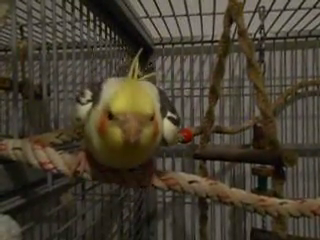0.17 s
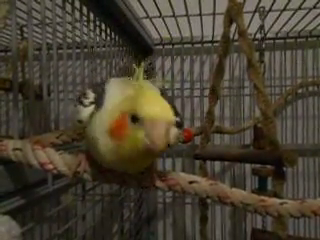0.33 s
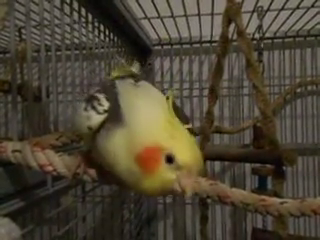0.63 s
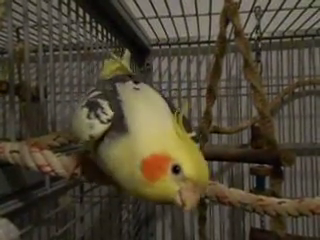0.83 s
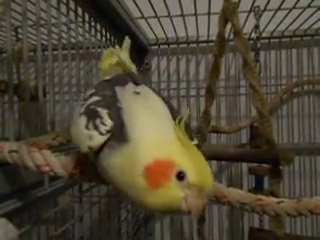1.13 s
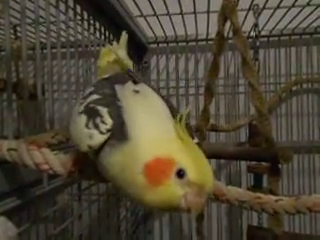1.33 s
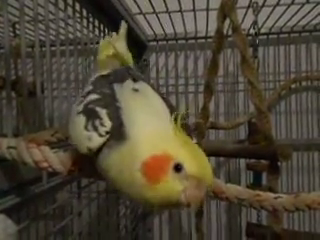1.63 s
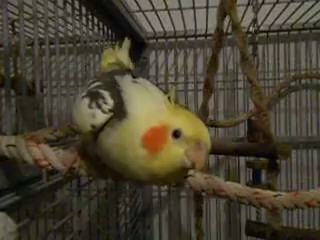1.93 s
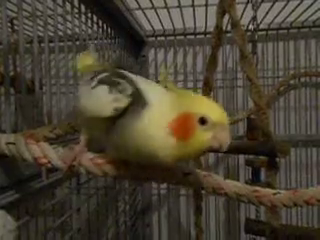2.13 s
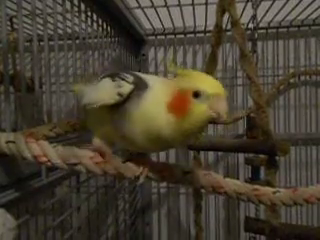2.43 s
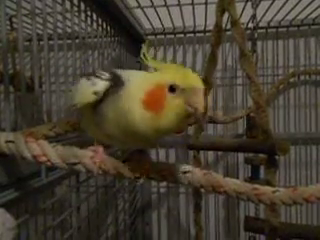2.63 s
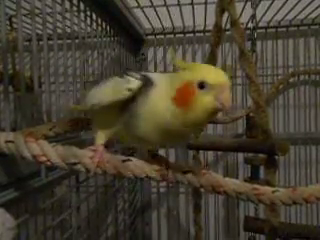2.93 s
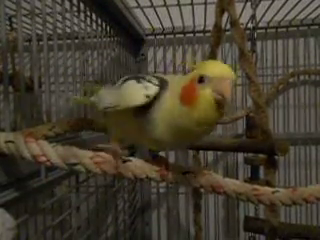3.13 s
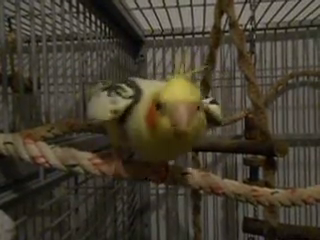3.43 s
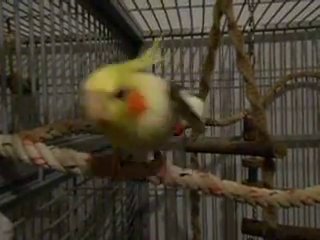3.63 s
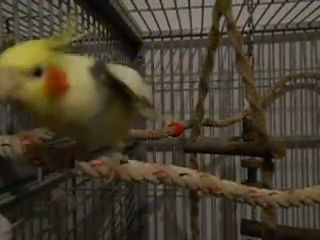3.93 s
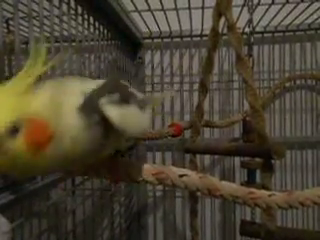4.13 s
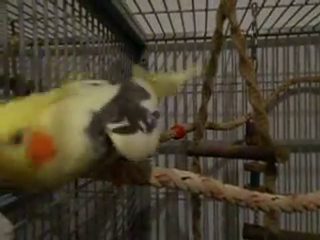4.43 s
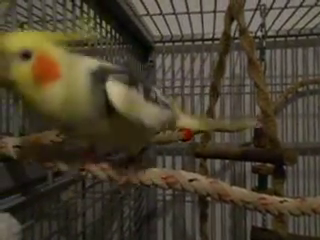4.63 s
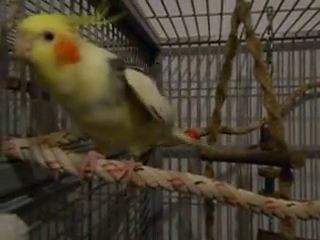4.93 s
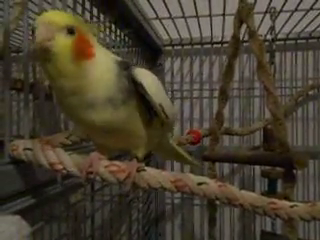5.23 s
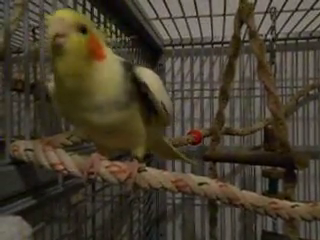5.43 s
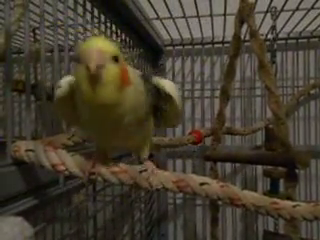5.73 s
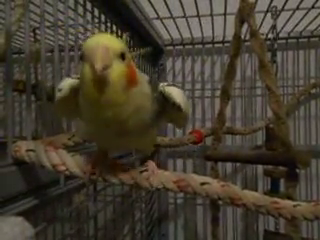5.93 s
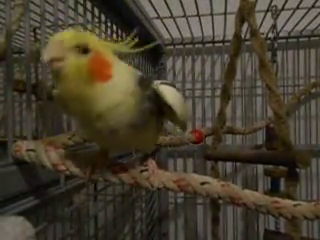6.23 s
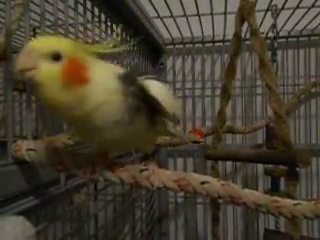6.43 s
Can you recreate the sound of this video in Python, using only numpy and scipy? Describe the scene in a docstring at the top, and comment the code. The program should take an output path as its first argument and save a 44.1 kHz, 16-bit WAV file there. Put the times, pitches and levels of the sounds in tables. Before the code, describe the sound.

A small, lightly echoing room with low steady hiss; a soft rustle peaks at 0.2 s with a low cluck. From 0.43 s a close cockatiel whistles short arched notes, each under a tenth of a second, around 2 kHz, with buzzy edges. They come in fours, the last usually lower and duller, starting near 0.4, 1.0, 1.7, 2.4, 3.0 and 3.7 s, the final run loudest and briefly crackling with distortion. A hard click and a far bird's rising call land near 1 s. From 1.3 to 4.5 s a small toy bell tinkles thinly, about four strokes a second, then weakens. At 4.3 s a foot scrapes, with a weak buzzy cluck and another far call. Quiet follows, broken by a sharp tick at 4.94 s and a cluck at 5.2 s. Loud whistles resume at 5.45-5.8 s with slight crackle, a faint distant call and weak cluck follow, and a last falling phrase runs from 6.1 s to the end.

```python
"""A cockatiel on a rope perch close to the microphone opens with a low cluck, then whistles runs of short
arched notes in a small room: gliding harmonic tones with a subharmonic buzz at onset and end.
From 1 s a more distant bird gives three calls, mostly by reflection; a toy bell of decaying modes
swings until past 4 s. Claws tick here and there, and a foot scrapes at 4.3 s as noise before the later notes.
The recorder samples at half rate, and from 3.9 s some of the loudest notes overflow by changing sign."""
import sys
import numpy as np
from scipy import signal
from scipy.fft import next_fast_len
from scipy.io import wavfile
from scipy.ndimage import uniform_filter1d

SR = 44100
rng = np.random.default_rng(int(sys.argv[2]) if len(sys.argv) > 2 else 0)


def undo_db(level):
    """Turn decibels back into plain size, where 20 dB means ten times bigger."""
    steps = np.asarray(level, float) / 20
    return 10 ** steps


def waveform_to_disk(signal):
    """Save audio, clipped to [-1, 1], as 16-bit WAV at the path in sys.argv[1]."""
    frames = np.transpose(np.atleast_2d(signal))
    scaled = np.clip(frames, -1, 1) * 32767
    samples = np.round(scaled).astype(np.int16)
    wavfile.write(sys.argv[1], SR, samples)


N = 290619


def evened(x):
    """Normalization: scales a signal to unit rms."""
    return x / np.sqrt(np.mean(x ** 2) + 1e-20)


def read(points, hz):
    """Logarithmic frequency scale: interpolates a curve on it."""
    f, value = np.transpose(points)
    return np.interp(np.log(hz + 1), np.log(f + 1), value)


def add(mix, s, sound):
    """Superposition: adds a sound to the mix at time s."""
    part = mix[round(s * SR):][:len(sound)]
    part += sound[:len(part)]


def wobble(size, hz):
    """Band-limited noise: random fluctuation of unit rms, up to about hz."""
    white = rng.standard_normal(size + 2000)
    return evened(signal.lfilter(*signal.butter(2, hz, fs=SR), white)[2000:])


def tents(rows):
    """Exponential level change: in dB, two straight slopes per row (t, level, rise before, fall after)."""
    t = np.arange(N) / SR
    return np.array([level - np.where(t < s, before * (s - t), after * (t - s))
                     for s, level, before, after in rows])


def noise(spectrum, level_db, patchy_db):
    """Spectral shaping of Gaussian noise: random short-time spectra, uneven in small patches."""
    hz = np.fft.rfftfreq(512, 1 / SR)
    real, imaginary, patches = rng.standard_normal((N // 128 + 5, 257, 3)).T
    patches = evened(uniform_filter1d(uniform_filter1d(patches, 6, 0), 16, 1))
    spectra = (real + 1j * imaginary) * undo_db(read(spectrum, hz)[:, None] + patchy_db * patches)
    return evened(signal.istft(spectra, nperseg=512, noverlap=384)[1][:N]) * undo_db(level_db)


# spectral shape of the steady background: f/Hz, relative density/dB
AIR = [(35, -28), (60, -20.5), (1240, -8.5), (1450, -3), (2910, -10.5), (3540, -21.5), (9040, -34.5),
       (11000, -45), (14300, -68), (22000, -120)]
# spectral shape of the rustle: f/Hz, relative density/dB
RUSTLE = [(120, -37.5), (200, -16.5), (2020, -5.5), (2270, -20.5), (6650, -19), (11000, -30), (14300, -46),
          (22000, -120)]
# background dips: t of deepest point/s, level change/dB, fall/(dB/s), return/(dB/s)
AIR_DIPS = [(1.2, -26, 275, 81), (4.251, -8, 11, 4), (4.699, -28.5, 59, 103), (6.5, -13, 13, 14)]
# rustle levels: t of turning point/s, level/dB, rise before/(dB/s), fall after/(dB/s);
# the row at 0.6 s sinks to a steady faint rustle
RUSTLES = [(.199, -34, 23, 222), (.6, -53, -6, 0), (4.276, -54.5, 901, 280), (4.498, -38, 197, 600)]


def background():
    """Incoherent addition: a noise floor that dips and creeps back, plus independent rustle of varying level."""
    dips = tents([(s, -db, fall, back) for s, db, fall, back in AIR_DIPS])
    air_db = -44.5 - np.maximum(dips.max(0), 0)
    return noise(AIR, air_db, 1.5) + noise(RUSTLE, tents(RUSTLES).max(0), 2.)


# reverberation time before the factor `longer`: f/Hz, T60/s
ROOM = [(300, 0.66), (1300, 0.34), (3000, 0.3), (6000, 0.21), (10000, 0.17)]


def room(x, delay, longer):
    """Reverberation: sparse reflections of random sign, each band decaying at its own rate."""
    taps = np.zeros(SR)
    at = np.arange(round(delay * SR), SR - 20, 20)
    taps[at + rng.integers(0, 20, len(at))] = rng.choice([-1., 1.], len(at))
    hz, t, z = signal.stft(taps, SR, nperseg=256)
    decay = undo_db(-60 * t / (longer * read(ROOM, hz)[:, None]))
    tail = signal.istft(z * decay, SR, nperseg=256)[1]
    return signal.fftconvolve(x, tail / np.linalg.norm(tail))[:N]


# contour of one far call: share of length, share of the climb in pitch, relative level/dB
FAR_SHAPE = [(0, 0.27, -14.5), (.1, .32, -1.5), (.23, .5, -1.5), (.31, .6, -1), (.37, .85, 2.5),
             (.55, .96, -0.5), (.73, 1, -7), (.88, 1, -14), (1.001, .3, -31.5)]


def far_call(length, top_db, from_hz, top_hz, slow):
    """Frequency modulation: a clear whistle rises and drops at its end, its overtones slightly hoarse."""
    u = np.arange(0, length, 1 / SR) / length
    at, climb, db = np.transpose(FAR_SHAPE)
    climb = np.interp(u ** slow, at, climb)
    db = top_db + np.interp(u ** slow, at, db)
    hz = from_hz + (top_hz - from_hz) * climb
    octave_db = -6.5 - 29.5 * climb  # purer as it climbs
    hz = uniform_filter1d(hz, 300) * (1 + .005 * wobble(len(hz), 120))
    turn = 2 * np.pi * np.cumsum(hz) / SR
    over = np.cos(2 * turn) + undo_db(-8) * np.cos(3 * turn)
    over = over * (1 + .9 * wobble(len(hz), 300))
    voice = np.cos(turn) + undo_db(octave_db) * over
    return np.sqrt(2) * undo_db(db) * voice * signal.windows.tukey(len(hz), .1)


# far calls, level before the distance loss: t/s, length/s, level/dB, opening f/Hz, top f/Hz,
# exponent that slows the climb
FAR_BIRD = [(0.983, 0.22, -9.5, 1510, 3116, 1.), (4.346, 0.24, -9, 1520, 3119, 1.3),
            (5.824, 0.12, -26.5, 1422, 1976, 1.6)]


def far_bird():
    """Superposition: places the calls of the second bird in time."""
    out = np.zeros(N)
    for s, *call in FAR_BIRD:
        add(out, s, far_call(*call))
    return out


# bell modes, the middle two a close pair: f/Hz, T60/s
BELL = [(1669, 1.6), (5001, 1.4), (5022, 1.4), (9907, .4)]
# clapper blows: t/s, level/dB, angle round the rim/rad, extra level of the low mode from a soft blow/dB
STRIKES = [(1.305, -45.5, .95, -6), (1.561, -32.5, 1.33, 6.5), (1.825, -37, 0.57, -4.5),
           (2.062, -31.5, 1.3, -13), (2.1, -35, 1.25, 4), (2.304, -31.5, 0.3, -1), (2.548, -33, 1.05, 0.5),
           (2.787, -35, 0.64, -3), (2.987, -41, 0.87, 12), (3.211, -35.5, 0.52, 3),
           (3.403, -43.5, .38, 9.5), (3.76, -41.5, 0.6, 3.5), (4.001, -48.5, 1.4, 6), (4.238, -50, 0.5, -6),
           (4.45, -47.5, 1.24, -2)]
OUTER_MODES_DB, CHAIN_DB = -5.5, -9  # lowest and highest mode; chain clatter


def bell():
    """Modal synthesis: each blow stills the last ring and excites new modes; the close pair beats."""
    out, t = np.zeros(N), np.arange(SR) / SR
    for (s, blow_db, angle, soft_db), later in zip(STRIKES, STRIKES[1:] + [(N,)]):
        # the angle of the blow divides its strength between the close pair
        shares = undo_db(OUTER_MODES_DB + soft_db), np.cos(angle), np.sin(angle), undo_db(OUTER_MODES_DB)
        ring = np.zeros(SR)
        for (hz, t60), share in zip(BELL, shares):
            build_up = 1 - np.exp(-t * 60 * (hz / 5000) ** 2)  # low modes build up more slowly
            ring += share * undo_db(blow_db - 60 * t / t60) * np.sin(2 * np.pi * hz * t) * build_up
        stilled = np.exp(-60 * np.maximum(t - later[0] + s, 0))
        add(out, s, ring * stilled)
        clatter = np.diff(wobble(SR // 4 + 1, 4300))  # the chain shakes with each blow
        add(out, s, undo_db(blow_db + CHAIN_DB - 60 * t[:SR // 4] / 0.2) * clatter)
    return out


def scrape(hz=1200, t60=0.16):
    """Friction noise: a foot drags over the rope with a low, grainy, decaying rasp."""
    t = np.arange(SR // 4) / SR
    rasp = wobble(len(t), hz) * (1 + .6 * wobble(len(t), 150))
    return undo_db(-30 - 60 * t / t60) * signal.lfilter(*signal.butter(2, 250, "high", fs=SR), rasp)


# contacts of claws and beak: t/s, peak level/dB, ring f/Hz
TICKS = [(0.981, -11, 1366), (1.482, -46, 1930), (4.286, -50, 6720), (4.308, -47, 7300),
         (4.943, -19.5, 5640), (4.944, -20.5, 1830), (5.772, -40, 5050)]


def ticks():
    """Damped impact response: claws and beak on wire and rope give a few soft-edged cycles and a puff."""
    out, t = np.zeros(N), np.arange(600) / SR
    for (s, db, hz), puff in zip(TICKS, rng.standard_normal((len(TICKS), 600))):
        envelope = np.e * t * hz * np.exp(-t * hz)
        add(out, s, undo_db(db) * envelope * (np.sin(2 * np.pi * hz * t) + 0.032 * puff))
    return out


HIGH_HZ = 1700  # pitch that parts high notes from low
# overtone level against the whistle's pitch: whistle f/Hz, level/dB
BRIGHT = [(1200, -7.5), (1500, -14), (1850, -20), (2050, -22), (2250, -20), (2500, -11.5)]
ATTACK_S, ATTACK_DB, SWELL_SHARE = .005, -22, 0.64
BUZZ_DB, BUZZ_FADE_DB_PER_S, LOCKED_DB, END_BUZZ_DB = -12, 1796, -52, -20


def shape(length, from_hz, to_hz, buzz_s, sag, swell_db):
    """Breath-driven oscillation: swell and loss of breath set level, pitch, brightness and buzz."""
    t = np.arange(0, length, 1 / SR)
    u = t / length
    tau, hz_share, sag_db = sag
    spent = np.exp((t - length) / tau)  # grows as the breath runs out
    hz = (to_hz + (from_hz - to_hz) * (1 - u) ** 2) * (1 - hz_share * spent)
    attack_db = ATTACK_DB * np.maximum(1 - t / ATTACK_S, 0)
    db = attack_db + swell_db * np.maximum(1 - u / SWELL_SHARE, 0) + sag_db * spent
    middle_hz = np.median(hz)
    over_db = read(BRIGHT, middle_hz) + 9 * (u - .5) * (middle_hz < HIGH_HZ)  # low notes brighten
    opening_db = BUZZ_DB - BUZZ_FADE_DB_PER_S * np.maximum(t - buzz_s, 0)
    locked_db = LOCKED_DB + (END_BUZZ_DB - LOCKED_DB) * spent
    return db, hz, over_db, np.maximum(opening_db, locked_db)


# relative weight of the overtones: f/Hz, level/dB
OVERTONES = [(2400, 0.5), (3050, 5.5), (4400, -6), (6600, -7), (8500, -22.5), (10500, -27.5)]
# relative weight of the buzz partials: f/Hz, level/dB
BUZZ = [(600, -10.5), (1400, 2), (2600, -11), (4000, -17), (6500, -24), (10000, -51)]


def note(db, hz, over_db, buzz_db):
    """Subharmonics: before the whistle locks, the syrinx buzzes at a half or a third of its pitch."""
    size = len(hz)
    hz = uniform_filter1d(hz, 260) * (1 + (.003 + .04 * undo_db(buzz_db)) * wobble(size, 250))
    turn = 2 * np.pi * np.cumsum(hz) / SR
    over, buzz = np.zeros(size), np.zeros(size)
    for k in range(2, 9):
        # each overtone comes and goes
        level_db = read(OVERTONES, k * hz) + .08 * over_db * k + 3.0 * wobble(size, 40)
        over += undo_db(level_db) * (k * hz < SR / 4) * np.cos(k * turn)
    step = 3 if np.median(hz) > HIGH_HZ else 2
    for k in range(1, 16):
        if k % step:  # the others are harmonics of the whistle
            partial_hz = k * hz / step
            buzz += undo_db(read(BUZZ, partial_hz)) * (partial_hz < SR / 4) * np.cos(k * turn / step)
    buzz = buzz * (1 + 0.5 * wobble(size, 280))
    voice = np.cos(turn) - undo_db(over_db - 2.5) * over - undo_db(buzz_db) * buzz
    flutter_db = .9 * wobble(size, 89)
    return np.sqrt(2) * undo_db(db + flutter_db) * voice * signal.windows.tukey(size, .04)


# notes that swell: t/s, length/s, top level/dB, opening f/Hz, aimed-for f/Hz, buzz time before its fade/s
WHISTLES = [(0.433, 0.063, -10.5, 2384, 1960, 0.009), (0.555, 0.059, -5.5, 2214, 2361, 0.0036),
            (0.673, 0.074, -6.5, 1974, 2117, 0.014), (0.816, 0.086, -12.5, 1572, 1454, 0.015),
            (1.039, 0.078, -13, 2230.0, 2092, 0.01), (1.189, 0.084, -18.5, 1614, 2126, 0.007),
            (1.34, 0.088, -13.5, 1576, 2146, 0.0041), (1.498, 0.081, -20, 1414, 1398, 0.016),
            (1.729, 0.092, -9, 1725, 2070.0, 0.0094), (1.883, 0.066, -9.5, 2160, 2515, 0.0046),
            (2.015, 0.07, -9.5, 1960, 2170, 0.0066), (2.166, 0.075, -13, 1420, 1576, 0.0073),
            (2.408, 0.062, -12, 2383, 2164, 0.0029), (2.532, 0.075, -10, 2107, 2640, 0.016),
            (2.667, 0.079, -10.5, 2014, 2084, 0.0096), (2.819, 0.084, -18.5, 1323, 1334, 0.035),
            (3.044, 0.079, -9.5, 2039, 2206, 0.032), (3.179, 0.072, -5.5, 2100, 2463, 0.012),
            (3.311, 0.083, -7, 1937, 2210, 0.015), (3.47, 0.091, -20.5, 1590, 1333, 0.036),
            (3.739, 0.072, -8, 1870.0, 1961, 0.036), (3.874, 0.061, -3, 2085, 2760, 0.0097),
            (4.002, 0.061, -5, 2124, 2505, 0.0053), (4.136, 0.086, -11, 1894, 1813, 0.015),
            (5.458, 0.07, -9, 2200, 2134, 0.027), (5.582, 0.072, -3.5, 1919, 2435, 0.01),
            (5.723, 0.102, -9, 1963, 2017, 0.011), (6.137, 0.097, -10, 1984, 1846, 0.039),
            (6.288, 0.06, -3.5, 1913, 2390, 0.01), (6.41, 0.073, -12, 1677, 2060.0, 0.0089),
            (6.548, 0.08, -17.5, 1468, 1223, 0.025)]
# low notes struck without a swell: t/s, length/s, top level/dB, opening f/Hz, aimed-for f/Hz,
# buzz time before its fade/s
CLUCKS = [(.205, 0.043, -13, 1333, 1246, 0.0033), (4.33, 0.097, -27, 1239, 1382, 0.091),
          (5.208, 0.069, -17, 1248, 1223, 0.029), (5.905, 0.086, -24.5, 1263, 1234, 0.0035)]
SWELL_DB, RUN_GAP_S = -13.5, .1
# as the breath runs out: time constant/s, share of pitch lost, level change/dB
LONG_SAG, SHORT_SAG = (.012, .4, -18), (0.0062, 0.22, -20)


def song():
    """Breath release: a note's height and the gap before it choose how its pitch and level give way."""
    out, ended = np.zeros(N), 0
    rows = [(*row, SWELL_DB) for row in WHISTLES] + [(*row, 0) for row in CLUCKS]
    for s, length, top_db, from_hz, to_hz, buzz_s, swell_db in sorted(rows):
        # high notes inside a run end on the long sag
        sag = LONG_SAG if to_hz > HIGH_HZ and s - ended < RUN_GAP_S else SHORT_SAG
        db, *rest = shape(length, from_hz, to_hz, buzz_s, sag, swell_db)
        add(out, s, note(top_db + db, *rest))
        ended = s + length
    return out


def scene():
    """Direct-to-reverberant ratio: the near bird is mostly direct, the far bird mostly reflected."""
    far = far_bird()
    near = ticks() + song()
    add(near, 4.273, scrape())
    birds = near + undo_db(-15.5) * room(near, .006, 1.05)
    birds += undo_db(-12) * far + undo_db(-5.5) * room(far, .003, 0.78)
    birds += undo_db(-15.5) * room(far + undo_db(-11.0) * near, 0.021, 1.84)  # the rest of the house rings on
    return (background() + bell() + birds)[None]


def low_pass(x):
    """Removes everything above the highest recorded frequency."""
    return signal.sosfilt(signal.butter(12, 12330, fs=SR, output="sos"), x)


# overflows: start t/s, end t/s, share of the limited swing above which crests wrap, the same for troughs
OVERFLOWS = [(3.9146, 3.9167, .9, 1.1), (3.9248, 3.92535, .85, .88), (5.6167, 5.6348, .9, .9),
             (6.3111, 6.31246, .88, .88)]


def record(dry):
    """Sampling and overflow: bass cut, half rate, limiter, wrapped crests, leaky return to full rate."""
    bass_cut = signal.lfilter(*signal.butter(1, 90, "high", fs=SR), dry[0])
    x = signal.resample_poly(bass_cut, 1, 2)
    t = np.arange(len(x)) * 2 / SR
    envelope = abs(signal.hilbert(x, next_fast_len(len(x)))[:len(x)])
    swing = uniform_filter1d(envelope, 20)
    held = np.minimum(swing, .72)
    x = x * held / (swing + 1e-9)
    for start, end, crest, trough in OVERFLOWS:
        span = (t > start) & (t < end)
        full = min(crest, trough) * held
        above = span & (x > crest * held)
        below = span & (x < -trough * held)
        x = x - 2 * full * above + 2 * full * below  # wraps to the other sign
    full_rate = np.zeros(2 * len(x))
    full_rate[::2] = 2 * x
    # lets a mirror of the treble through
    smooth = signal.firwin(41, 10850, window=("kaiser", 5.5), fs=SR)
    mix = signal.oaconvolve(full_rate, smooth, "same")[None, :N]
    return low_pass(mix)


dry = scene()
out = record(dry)
waveform_to_disk(out)
```